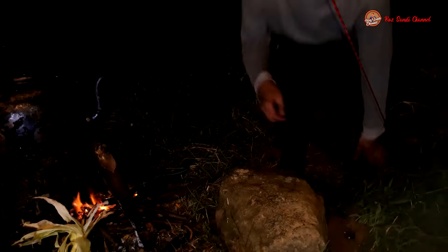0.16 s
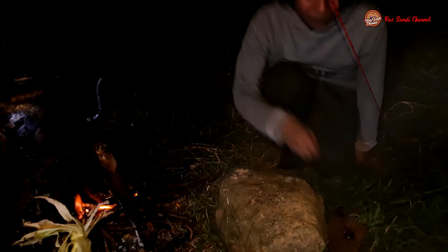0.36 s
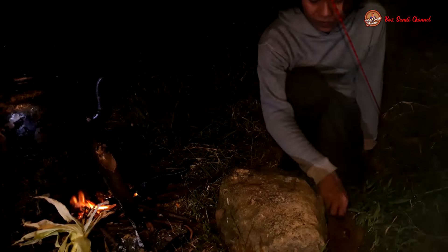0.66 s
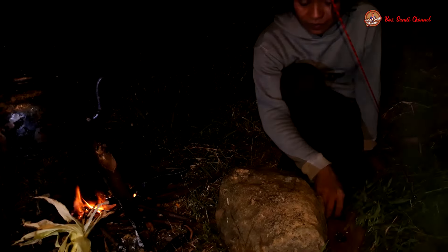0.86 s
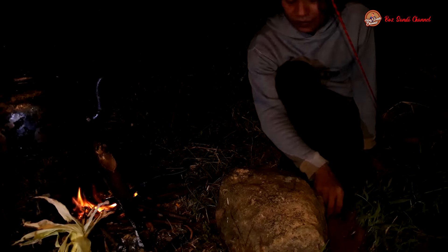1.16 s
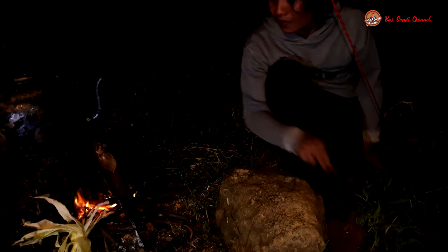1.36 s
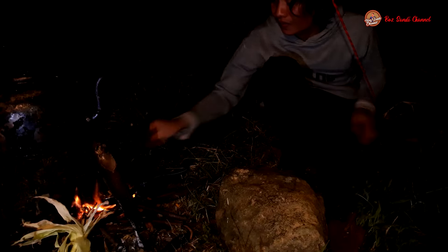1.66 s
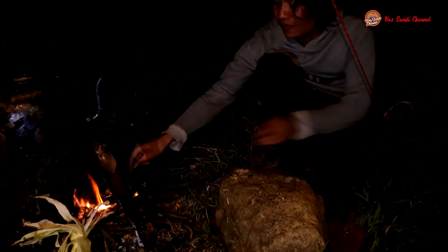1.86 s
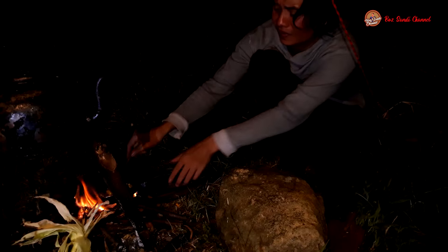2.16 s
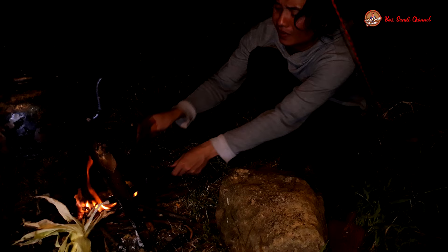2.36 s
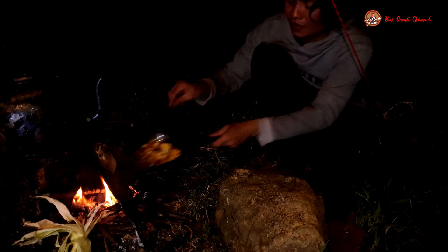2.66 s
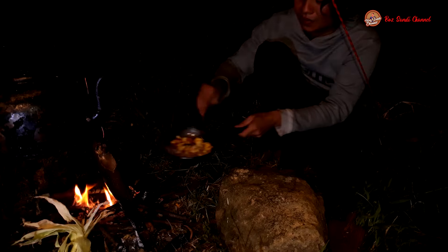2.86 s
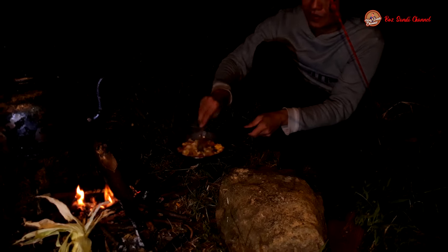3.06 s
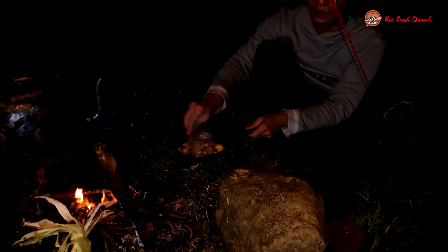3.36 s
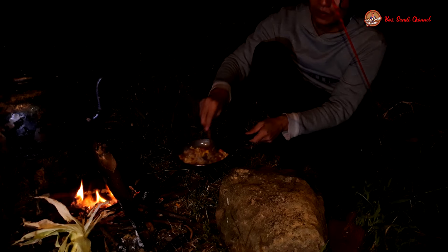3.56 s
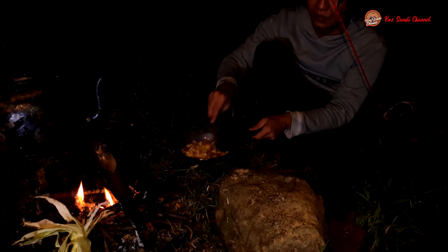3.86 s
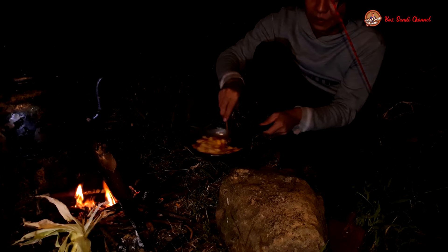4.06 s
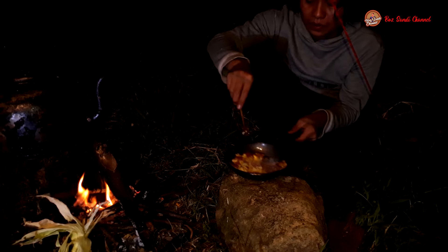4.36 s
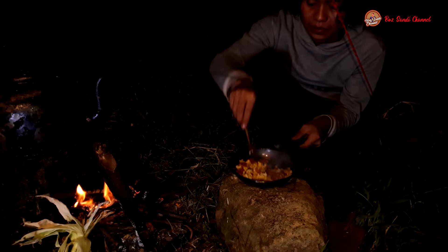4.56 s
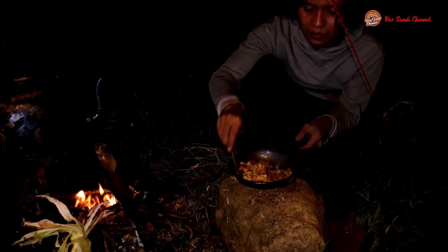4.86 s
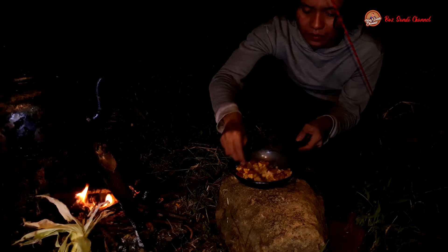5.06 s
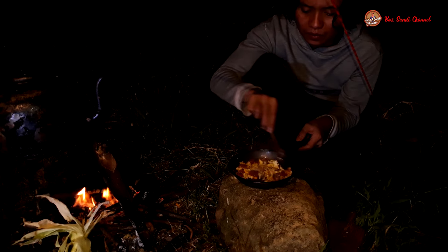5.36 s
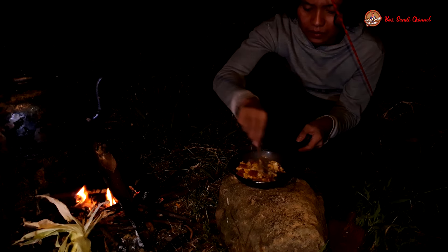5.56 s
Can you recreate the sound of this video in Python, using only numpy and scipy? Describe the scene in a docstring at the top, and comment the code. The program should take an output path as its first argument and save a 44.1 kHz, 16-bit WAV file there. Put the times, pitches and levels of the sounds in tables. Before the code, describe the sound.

Outdoors at night, mono, close and dry, with a small twig fire. A faint bed of fluttering far insects and soft low flame rush runs throughout. From 0 to 0.7 s small ticks and pops gather, with light hollow taps near 0.7 s, then a very loud, sharp crack at 0.77 s. A quieter gap follows, with one pop at 1.2 s. Strong snaps come at 1.7, 1.88 and 1.97 s, the last two with short woody knocks beneath. Lighter crackles continue until about 2.7 s, when the pops begin to crowd. From 3 s a hot pan's airy sizzle rises as it is brought nearer, peaking around 5.3 s; fat and ember spatter becomes dense, higher and spitting, with bright snaps near 4.3, 4.9, 5.1 and 5.3 s and a few dull thuds. A faint, thin cricket whistle surfaces around 4 to 5.5 s. Crackling continues to the end at about 5.7 s.

```python
"""Outdoors at night, by a small twig fire: bursting sap pockets pop as damped sines with noise splinters and spit.
A hot pan, shaped noise, hisses louder as it is carried nearer; fat and embers spatter as short noise grains.
Low woody bodies of some pops, and a few dull thuds, are single damped sines; something small and hollow rings
in two modes. Flame and air rush as low noise. Far insects blur into fluttering bands of noise, and one thin
cricket whistles as two unsteady sine lines."""
import sys
import numpy as np
from scipy import signal
from scipy.fft import rfft, irfft, next_fast_len
from scipy.io import wavfile
from scipy.ndimage import uniform_filter1d, map_coordinates

SR = 44100
rng = np.random.default_rng(int(sys.argv[2]) if len(sys.argv) > 2 else 0)


def dump_mix(stems):
    """Bounce the given channels to the path in sys.argv[1] as a 16-bit WAV at rate SR."""
    frames = np.atleast_2d(stems).T  # one column per channel
    limited = np.clip(frames, -1, 1)  # hard clip at full scale
    pcm = np.round(limited * 32767).astype(np.int16)
    wavfile.write(sys.argv[1], SR, pcm)


N = 252252  # samples

# clear pops of sap: t/s, snap level/dB, f/Hz, spit level relative to the snap/dB, splinter decay/ms (held to 0.2-8)
CLEAR_POPS = [(0.0489, -25.5, 5040, 3, 0.33), (0.2661, -25.5, 2290, 7, 0.48),
              (0.3389, -17.5, 2880, -19, 0.84), (0.3422, -15, 2920, -26, 0.55),
              (0.4581, -22, 3580, -14, 1.5), (0.5285, -19, 3400, -22, 9.4), (0.6103, -14.5, 2460, -25, 1.2),
              (0.6224, -17, 2480, -22, 2.6), (0.6825, -21, 1550, -13, 5.8), (0.7031, -22.5, 2650, 8.5, 1.7),
              (0.7528, -9.5, 3400, -18, 2), (0.7694, -1, 3660, -10, 0.8), (1.1976, -26.5, 4000, 9, 0.22),
              (1.7144, -6, 3890, -7, 0.68), (1.8099, -22.5, 2850, -12, 0.87), (1.8336, -19, 5000, -9, 2.5),
              (1.8519, -20.5, 2220, -12, 8.8), (1.8785, -5, 3500, 5.5, 0.14), (1.9722, -3, 2930, -28, 0.72),
              (2.0593, -32, 1500, -1, 0.9), (2.1055, -21, 2170, -12, 0.58), (2.1444, -25.5, 3070, 6, 1.7),
              (2.1945, -30, 2340, -12, 1.5), (2.2673, -27.5, 4570, 10, 0.73), (2.3688, -21, 3620, -10, 1.1),
              (2.5237, -23.5, 2220, 9.5, 0.63), (2.5559, -27, 4910, -1, 0.25),
              (2.672, -16.5, 3240, 6.5, 4.3), (2.7788, -19.5, 4570, 1, 1.6),
              (2.7906, -10.5, 3160, -35, 1.3), (2.8163, -17, 4100, 10, 0.42),
              (2.8734, -21.5, 2270, -15, 1.1), (2.9845, -16, 3260, -10.5, 0.2),
              (3.0173, -22, 4740, 10, 0.72), (3.0242, -16.5, 4200, 2, 1.5), (3.0514, -16, 4120, 1, 10),
              (3.1553, -29, 5440, 14.5, 1.7), (3.2026, -16.5, 4630, 2.5, 0.74),
              (3.2876, -30, 3020, 16, 2.2), (3.2937, -22.5, 5200, 4, 8.2), (3.3108, -22.5, 5950, 8, 2.2),
              (3.3467, -22, 3670, 9.5, 0.79), (3.3609, -23, 3360, -4, 3.5), (3.415, -26, 3200, -10, 0.7),
              (3.4255, -12.5, 4660, -7, 3.8), (3.445, -20.5, 4470, -7, 0.47), (3.5575, -15.5, 5470, 1, 5.4),
              (3.6864, -10, 3080, -18, 1.5), (3.71, -20, 4100, 8, 0.81), (3.8028, -14.5, 4340, 3, 10),
              (3.8296, -20, 4590, 7, 0.98), (3.8729, -18, 4600, 8, 0.73), (3.9487, -11.5, 5000, 4, 0.55),
              (3.9649, -16, 5600, 8, 2.9), (4.0027, -29, 4350, 20, 0.68), (4.1955, -12.5, 2860, -16, 1.2),
              (4.2829, -8, 5000, 9.5, 1.2), (4.3562, -19.5, 4260, 8.5, 2.3), (4.4708, -12, 4550, 2, 3.3),
              (4.5333, -27.5, 3040, 14.5, 4.2), (4.54, -28, 5860, 15, 1.4), (4.552, -26, 4080, 16.5, 1),
              (4.6007, -16, 3960, 3, 4.4), (4.714, -12, 2030, 2.5, 3), (4.798, -15, 5800, -1, 1.7),
              (4.8141, -21, 5120, 6, 0.93), (4.8789, -15.5, 5350, 1, 1.9), (4.8993, -15.5, 5150, 2, 4.3),
              (4.9132, -9, 3820, 3.5, 1.5), (4.9819, -14.5, 5060, -1, 0.41),
              (4.9953, -12.5, 3630, 7.5, 0.2), (5.0881, -7, 5020, 1, 1.3), (5.1401, -16.5, 5150, 7, 2.4),
              (5.1487, -13.5, 4270, 5.5, 0.17), (5.2803, -20, 4220, 14, 0.67),
              (5.3303, -10.5, 5030, 12, 0.44), (5.3705, -14.5, 5360, 0, 2.7), (5.39, -18, 5510, 9.5, 2.3),
              (5.409, -16.5, 3870, -3, 1.6), (5.5286, -20.5, 5780, 14, 4.1),
              (5.5418, -13.5, 4970, -4, 0.59), (5.5559, -20, 5060, -2, 1), (5.5624, -9.5, 5060, 12.5, 1.2)]
# low woody bodies of some pops, and other dull thuds: t/s, level/dB, f/Hz
LOW_BODIES = [(0.05, -37, 103), (.349, -39, 334), (1.879, -19, 1020), (1.9724, -11, 1050),
              (2.873, -28.5, 850), (3.017, -26, 830), (3.803, -23.5, 990), (4.195, -23, 634),
              (4.585, -29, 790), (4.601, -23, 485), (4.627, -23, 786), (5.388, -19, 786)]
# taps on something small and hollow: t/s, level/dB
HOLLOW_TAPS = [(0.6829, -24), (0.751, -31)]
# modes of the hollow object: f/Hz, level/dB, 60 dB decay time/s
HOLLOW_MODES = [(1530, -5.5, 0.088), (2160, -2, 0.06)]
# upper, then lower line of the cricket: full from t/s, full until t/s, level/dB
CRICKET_LINES = [(4, 5.3, -44.5), (3.7, 5.55, -46.5)]
# course of the background: t/s, insect chorus level/dB, pan hiss level/dB, spatter level/dB
BACKGROUND_LEVELS = [(0, -43, -46.5, -59), (.62, -36.5, -40, -47), (.85, -40, -43, -48.5),
                     (1.2, -43, -46, -57), (1.7, -43, -48, -59), (1.9, -43, -42, -47.5),
                     (2.6, -42.5, -66, -49.5), (3.1, -43, -39.5, -46.5), (3.8, -37.5, -37.5, -43.5),
                     (4.6, -36, -34, -44.5), (5.3, -37, -32, -44), (5.72, -37, -41, -42.5)]
# spectrum of the pan's hiss: f/Hz, density level/dB per Hz
HISS_SPECTRUM = [(400, -35), (800, -8), (2300, -4.5), (4500, 1), (8400, 1.5), (14200, 2.5), (16000, 0)]
# spectrum of the flame and air: f/Hz, density level/dB per Hz
RUSH_SPECTRUM = [(20, -40), (50, -9.5), (90, 2.5), (200, -2), (600, 3.5), (1500, -0.5), (2200, -69)]
# several kinds of insect, each in its own band: f/Hz, density level/dB per Hz
CHORUS_SPECTRUM = [(1300, -60), (1850, -5.5), (2650, -3.5), (3010, -8), (3660, -1.5), (4040, -4.5),
                   (4700, -1), (5410, -11), (6100, -1), (8250, 4.5), (9500, -5), (14200, -2), (16000, -15)]
# treble dip of the microphone: f/Hz, level/dB
MICROPHONE_RESPONSE = [(8600, -1), (9900, -12), (14000, -8)]

ECHO_S, ECHO_DB = .0038, -19.5  # delay, and level relative to the pop
# small pops: rate, spread in time around a clear pop
SMALL_PER_S, GATHER_S = 50, 0.032
# level over the spatter at t = 0, its growth, its spread; usual splinter decay
SMALL_DB, GROW_DB_PER_S, SMALL_SPREAD_DB, SMALL_MS = 13, 1.03, 6, 0.77
# usual pitch and spit at t = 0; both climb as the pan comes nearer
SMALL_HZ, RISE_HZ_PER_S, SMALL_SPIT_DB, SPIT_DB_PER_S = 2386, 450, -4, 2.5
CRICKET_HZ, SAG_HZ_PER_S, STROKE_HZ = 4300, 80, 205
SWELL_DB_PER_S, FADE_DB_PER_S = 70, 110  # onset and end of the whistle
RUSH_DB, RUSH_FOLLOWS_HISS = -12.5, 0.15  # level over the background; share taken from the hiss
TOP_HZ = 15750


def amp(db):
    """Logarithmic level: decibels to amplitude ratio."""
    return 10 ** (np.asarray(db) / 20)


def unit(x):
    """Normalization to a root mean square of 1."""
    return x / np.sqrt(np.mean(x ** 2) + 1e-20)


def peaked(rows):
    """Normalization of each row to a peak of 1."""
    return rows / np.abs(rows).max(axis=1, keepdims=True)


def curves(rows):
    """Linear interpolation: one value per sample for each column after the time."""
    s, *columns = np.transpose(rows)
    t = np.arange(N) / SR
    return [np.interp(t, s, column, left=column[0]) for column in columns]


def wobble(rate):
    """Spline interpolation of random knots, rate a second, into a smooth curve."""
    knots = rng.standard_normal(int(N * rate / SR) + 4)
    return map_coordinates(knots, [np.arange(N) * rate / SR])


def filtered(x, response):
    """Linear filtering: the spectrum of x times a response of frequency."""
    m = next_fast_len(N + 8192)
    spectrum = rfft(x, m) * response(np.fft.rfftfreq(m, 1 / SR))
    return irfft(spectrum, m)[..., :N]


def coloured(x, points):
    """Spectral shaping by (f/Hz, level/dB) points on a logarithmic frequency axis, rms 1."""
    f, db = np.transpose(points)

    def response(hz):
        return amp(np.interp(np.log(hz + 1), np.log(f + 1), db, left=-120, right=-120))

    return unit(filtered(x, response))


def band(x, lo_hz, hi_hz):
    """Causal band-pass filtering along the last axis."""
    sos = signal.butter(2, [lo_hz, min(hi_hz, SR / 2.1)], "band", fs=SR, output="sos")
    return signal.sosfilt(sos, x)


def scatter(times, sounds):
    """Superposition: each row of sounds is added at its time."""
    at = np.round(times * SR).astype(int)[:, None] + np.arange(sounds.shape[1])
    return np.bincount(at.ravel(), sounds.ravel(), N + sounds.shape[1] + SR)[:N]


def pops():
    """Impulsive release: a sap pocket bursts in a damped snap, a spit of treble and decaying splinters."""
    rows = np.vstack([CLEAR_POPS, small_pops()])
    s, db, hz, spit_db, ms = (c[:, None] for c in rows.T)
    t = np.arange(SR // 30) / SR
    tone = np.sin(2 * np.pi * hz * t)
    snap = peaked(tone * np.exp(-t * hz / 0.84) * (1 - np.exp(-t * hz * 3)))
    # noise whose strength changes in lumps of half a millisecond
    chance = rng.standard_normal((len(s), 2, len(t)))
    lump_db = 5 * chance[:, 1, ::24].repeat(24, axis=1)[:, :len(t)]
    lumps = chance[:, 0] * amp(lump_db)
    fade = np.exp(-t / (np.clip(ms, .2, 8) / 1000))
    tail = 0.098 * np.exp(-t / 0.0071)
    splinters = peaked(band(lumps * (fade + tail), 740, 5600))
    # the splinters also excite the pitch of their own pop
    ringing = peaked(tone * np.abs(uniform_filter1d(lumps, 30, axis=1)) * fade)
    spit = peaked(band(lumps * fade ** 1.75, 5100, 13500))
    wood = snap + amp(-2.5) * splinters + amp(-6.0) * ringing
    burst = amp(db) * (wood + amp(spit_db) * spit)
    # a weaker echo off the ground follows every pop
    second = amp(db + ECHO_DB) * (splinters + ringing)
    both = scatter(s[:, 0], burst) + scatter(s[:, 0] + ECHO_S, second)
    return band(both, 370, 25000)  # small sources radiate little bass


def small_pops():
    """Clustered random process: rows like CLEAR_POPS, near them in time, stronger, higher and brighter as t grows."""
    count = int(SMALL_PER_S * N / SR)
    parent = rng.integers(len(CLEAR_POPS), size=count)
    chance = rng.standard_normal((count, 5))
    s = np.array(CLEAR_POPS)[parent, 0] + GATHER_S * chance[:, 4]
    s = np.clip(s, 0, (N - 1) / SR)
    hz = (SMALL_HZ + RISE_HZ_PER_S * s) * amp(2.33 * chance[:, 1])
    spit_db = SMALL_SPIT_DB + SPIT_DB_PER_S * s + 3.96 * chance[:, 2]
    spatter_db = curves(BACKGROUND_LEVELS)[2][(s * SR).astype(int)]
    db = spatter_db + SMALL_DB + GROW_DB_PER_S * s + SMALL_SPREAD_DB * chance[:, 0]
    db = db - np.maximum(spit_db, 0)  # the snap is lowered by any positive spit, so the pop's peak stays near the drawn level
    ms = SMALL_MS * amp(6.4 * chance[:, 3])
    return np.transpose([s, db, hz, spit_db, ms])


def low_bodies():
    """Heavily damped oscillation: a pop's woody body or a dull thud gives one low push that dies in a few cycles."""
    s, db, hz = (c[:, None] for c in np.transpose(LOW_BODIES))
    t = np.arange(SR // 12) / SR
    push = np.sin(2 * np.pi * hz * t) * np.exp(-t * hz / 1.13) * (1 - np.exp(-t * hz * 4.6))
    return band(scatter(s[:, 0], amp(db) * peaked(push)), 107, 11000)


def taps():
    """Modal resonance: every tap rings the same two exponentially damped modes."""
    s, db = np.transpose(HOLLOW_TAPS)
    t = np.arange(SR // 12) / SR
    ring = sum(amp(level - 60 * t / t60) * np.sin(2 * np.pi * hz * t) for hz, level, t60 in HOLLOW_MODES)
    return scatter(s, amp(db)[:, None] * ring)


def cricket():
    """Amplitude-modulation sidebands: wing strokes split the sagging whistle into two unsteady lines."""
    t = np.arange(N) / SR
    whistle_hz = CRICKET_HZ - SAG_HZ_PER_S * t + 10 * wobble(60)
    phase = 2 * np.pi * np.cumsum(whistle_hz) / SR
    song = 0
    for k, (start, end, db) in enumerate(CRICKET_LINES):
        onset_db = SWELL_DB_PER_S * np.maximum(start - t, 0)
        ending_db = FADE_DB_PER_S * np.maximum(t - end, 0)
        level_db = db - onset_db - ending_db + 2.5 * wobble(25)
        song = song + amp(level_db) * np.sin(phase - 2 * np.pi * k * STROKE_HZ * t)
    return song


def pan_hiss():
    """Broadband noise: the hot pan's sizzle, rapidly fluctuating, rms 1."""
    return coloured(rng.standard_normal(N) * amp(2 * wobble(150)), HISS_SPECTRUM)


def crackle(rate, spread_db, longest_ms, low_hz, high_hz):
    """Shot noise: tiny random bursts in clumps, a few much larger than the rest; rms 1."""
    draw = rng.random((int(rate * N / SR), 3))
    size = amp(-spread_db * np.log(1 - .9 * draw[:, 1:2]))
    life_s = longest_ms / 1000 * amp(-15 * draw[:, 2:])
    t = np.arange(150) / SR
    grain = rng.standard_normal((len(draw), len(t))) * np.exp(-t / life_s)
    clumps = amp(3 * wobble(30))
    return unit(band(scatter(draw[:, 0] * N / SR, size * grain) * clumps, low_hz, high_hz))


def spatter():
    """Superposed shot noise: fat and embers give coarse grains and shorter, brighter ones."""
    coarse = crackle(rate=230, spread_db=12.5, longest_ms=1.0, low_hz=880, high_hz=7000)
    fine = crackle(rate=260, spread_db=6, longest_ms=.35, low_hz=3500, high_hz=18000)
    return coarse + amp(3) * fine


def flame_rush():
    """Turbulence noise: flame and air rush low and unsteadily, rms 1."""
    return coloured(rng.standard_normal(N) * amp(2.4 * wobble(25)), RUSH_SPECTRUM)


def insect_chorus():
    """Incoherent summation: far insects blur into fluttering bands of noise, rms 1."""
    return coloured(rng.standard_normal(N) * amp(1.23 * wobble(150)), CHORUS_SPECTRUM)


def night():
    """Level superposition: hiss, spatter, rush and chorus follow their courses; hiss and rush swell together."""
    chorus_db, hiss_db, spatter_db = curves(BACKGROUND_LEVELS)
    rush_db = RUSH_DB + chorus_db + RUSH_FOLLOWS_HISS * (hiss_db - chorus_db)
    swell = wobble(9)
    pan = amp(hiss_db + .5 * swell) * pan_hiss() + amp(spatter_db) * spatter()
    air = amp(rush_db + 0.45 * swell) * flame_rush()
    return pan + air + amp(chorus_db) * insect_chorus()


def scene():
    """Linear superposition of all sources at one microphone."""
    return (pops() + low_bodies() + taps() + cricket() + night())[None]


def record(dry):
    """Transducer response and saturation: treble dips, loud peaks are squeezed, deep bass and top are cut."""
    dip_hz, dip_db = np.transpose(MICROPHONE_RESPONSE)
    heard = filtered(dry, lambda hz: amp(np.interp(hz, dip_hz, dip_db)))
    squeezed = heard / (1 + np.abs(heard) ** 4) ** .25  # stays under full scale
    bass_cut = signal.butter(2, 45, "high", fs=SR, output="sos")
    return filtered(signal.sosfilt(bass_cut, squeezed), lambda hz: hz < TOP_HZ)


dry = scene()
out = record(dry)
dump_mix(out)
```